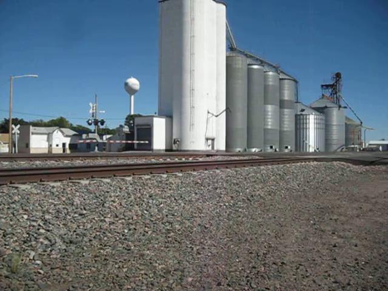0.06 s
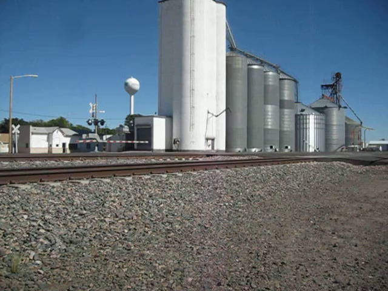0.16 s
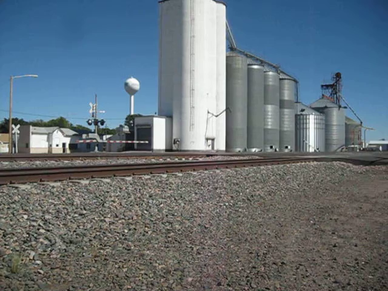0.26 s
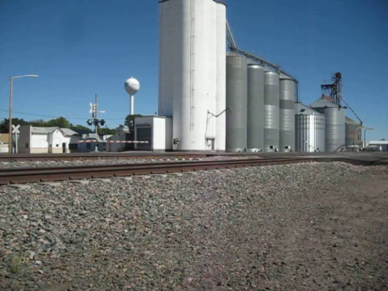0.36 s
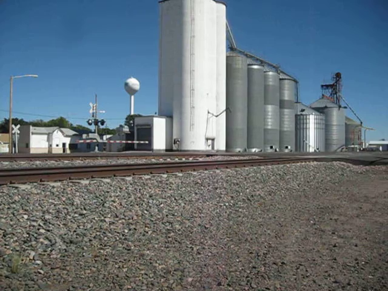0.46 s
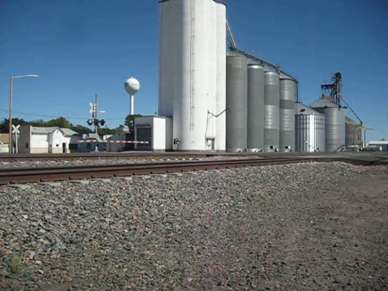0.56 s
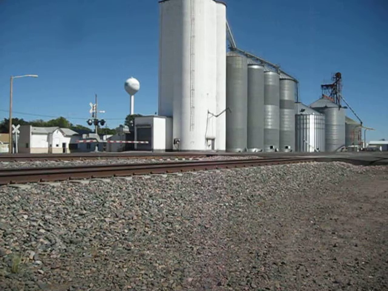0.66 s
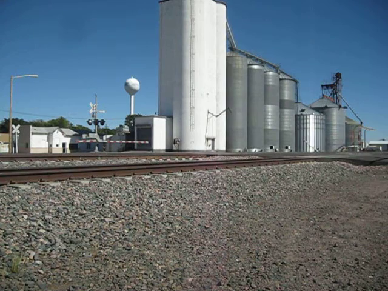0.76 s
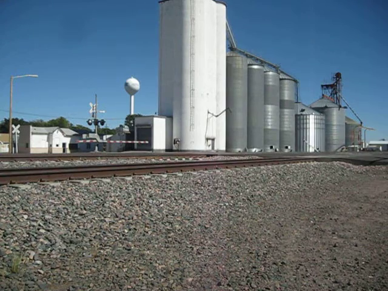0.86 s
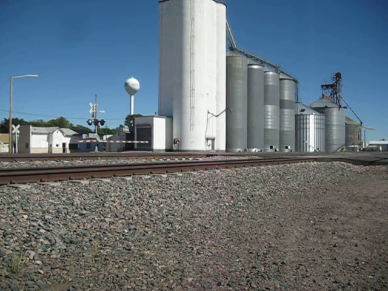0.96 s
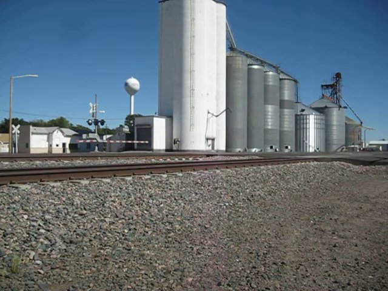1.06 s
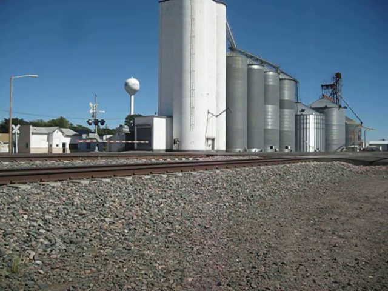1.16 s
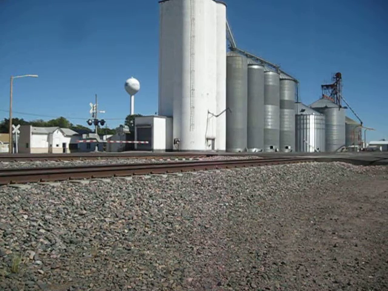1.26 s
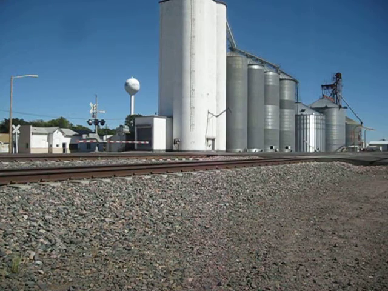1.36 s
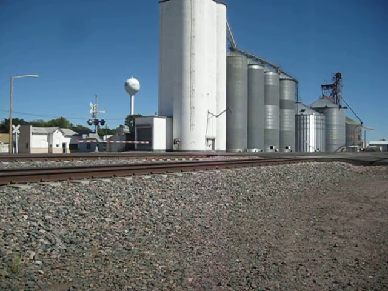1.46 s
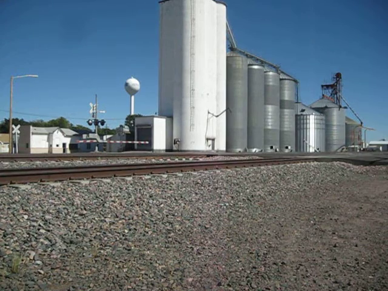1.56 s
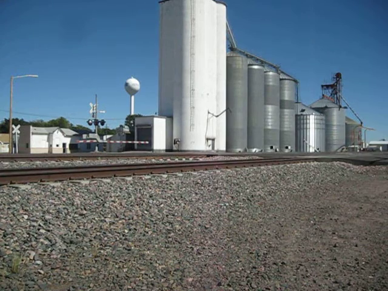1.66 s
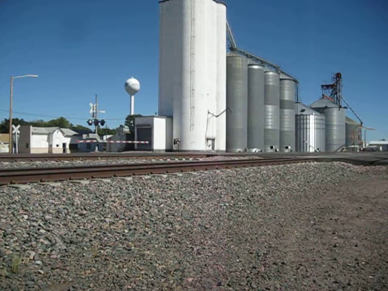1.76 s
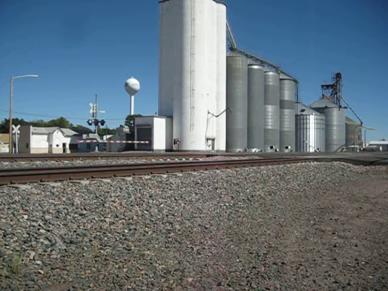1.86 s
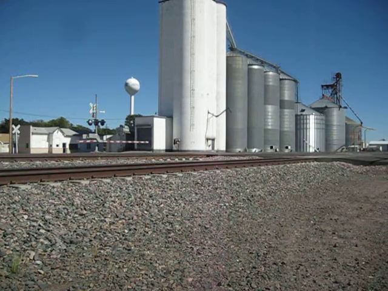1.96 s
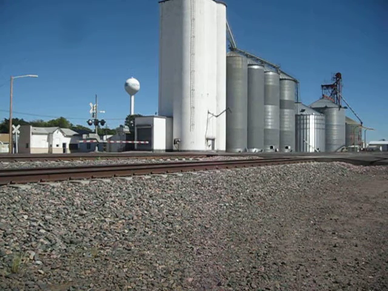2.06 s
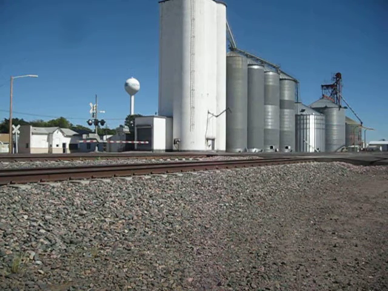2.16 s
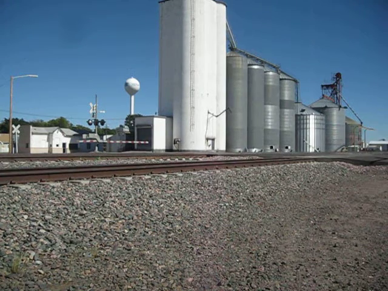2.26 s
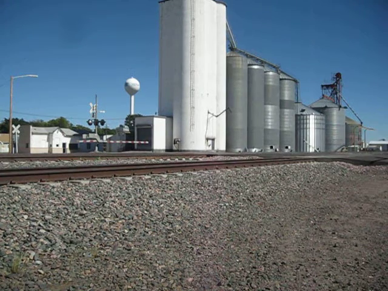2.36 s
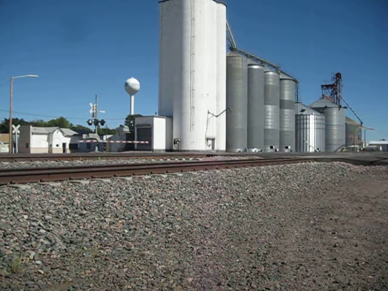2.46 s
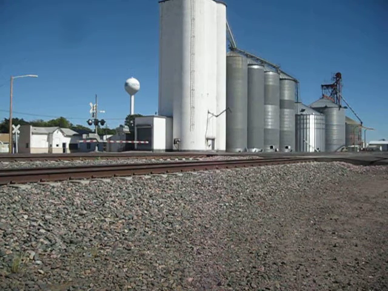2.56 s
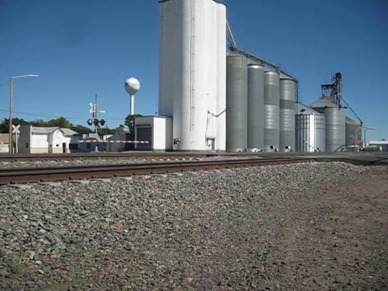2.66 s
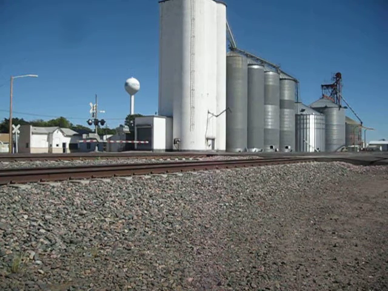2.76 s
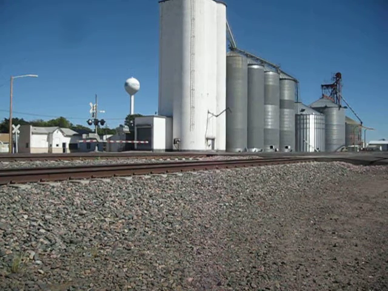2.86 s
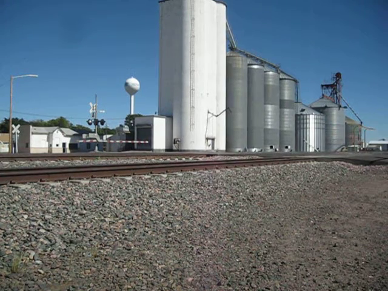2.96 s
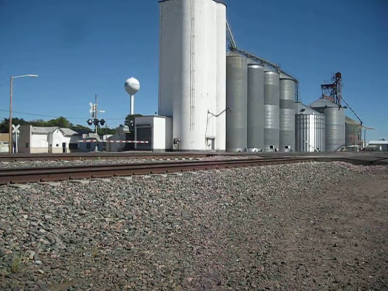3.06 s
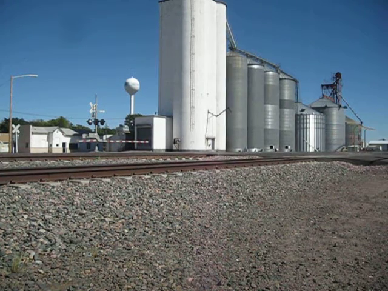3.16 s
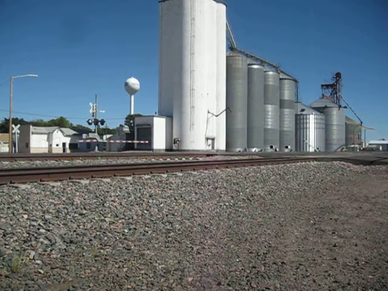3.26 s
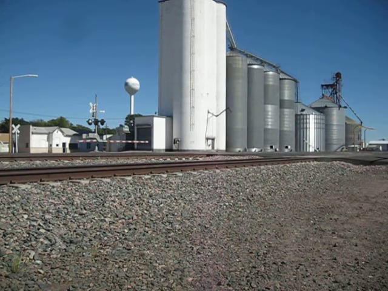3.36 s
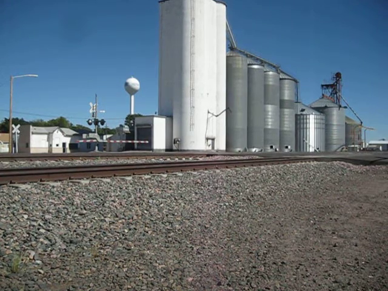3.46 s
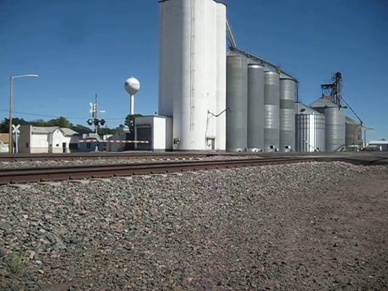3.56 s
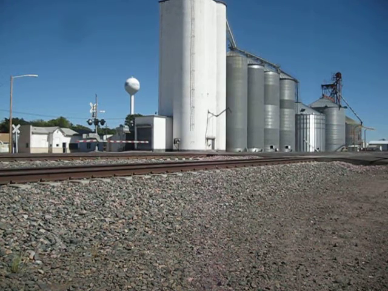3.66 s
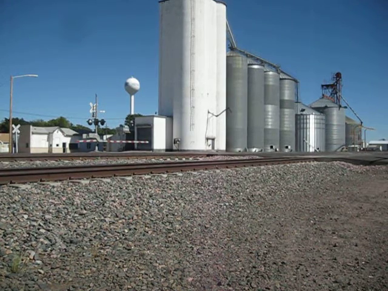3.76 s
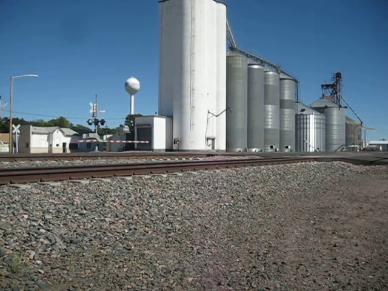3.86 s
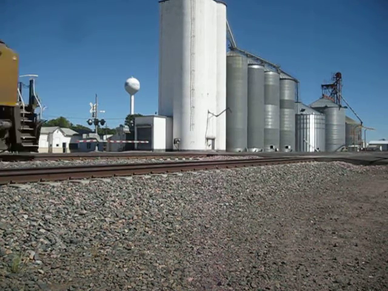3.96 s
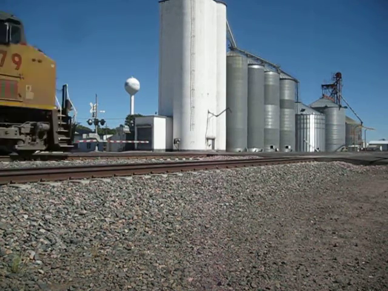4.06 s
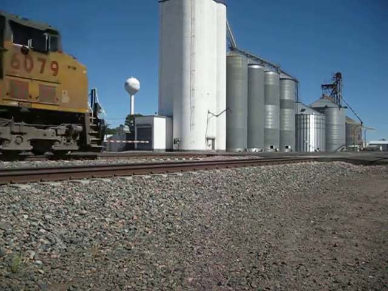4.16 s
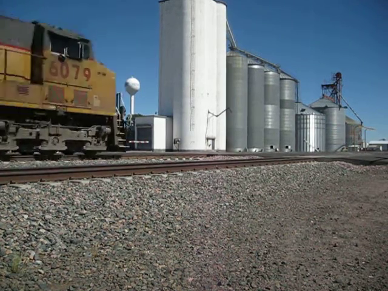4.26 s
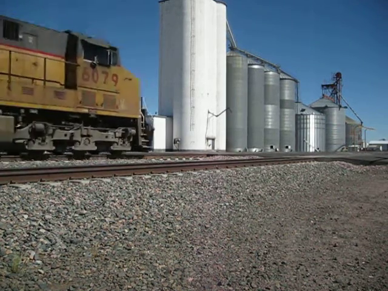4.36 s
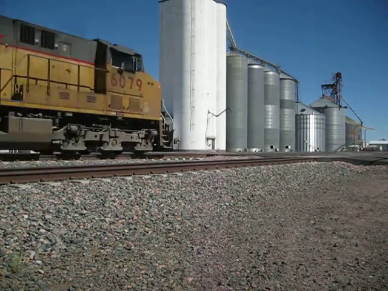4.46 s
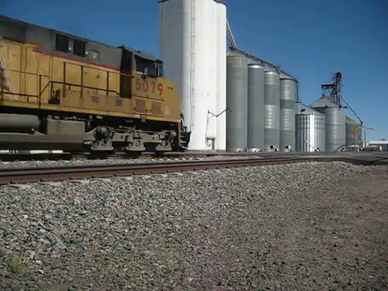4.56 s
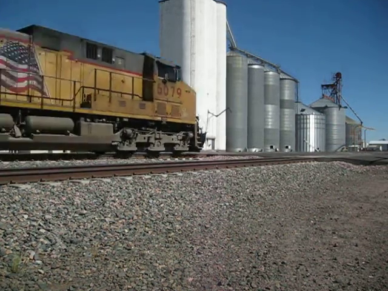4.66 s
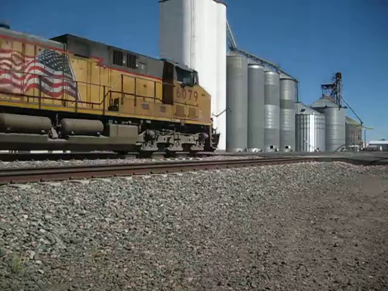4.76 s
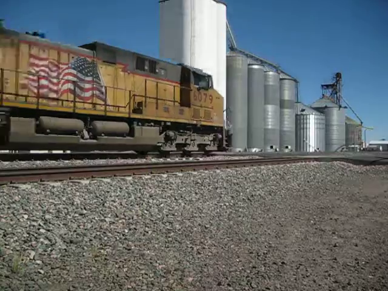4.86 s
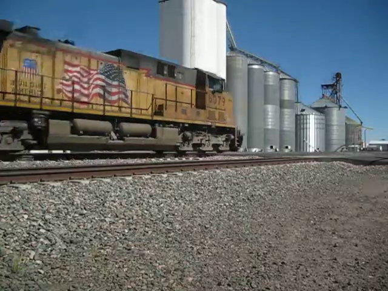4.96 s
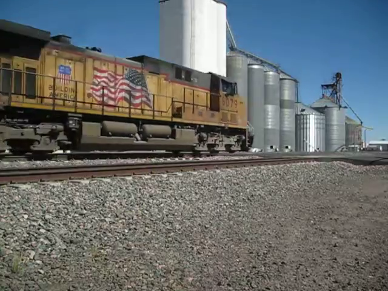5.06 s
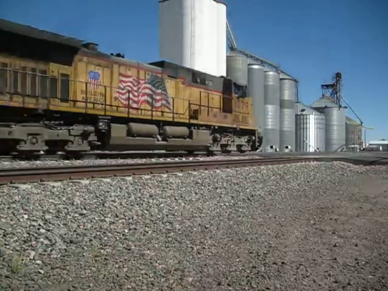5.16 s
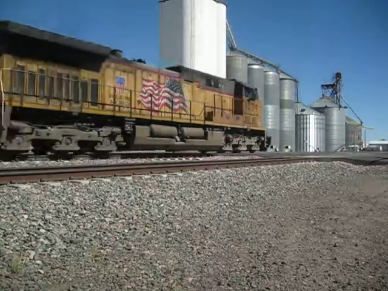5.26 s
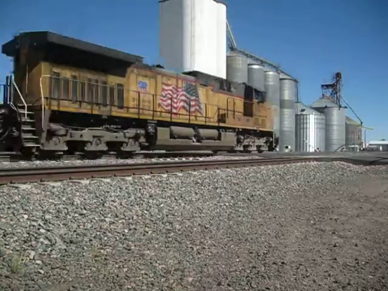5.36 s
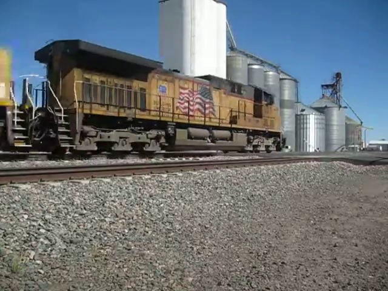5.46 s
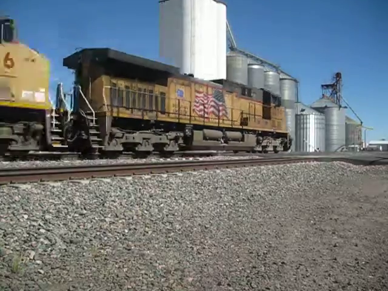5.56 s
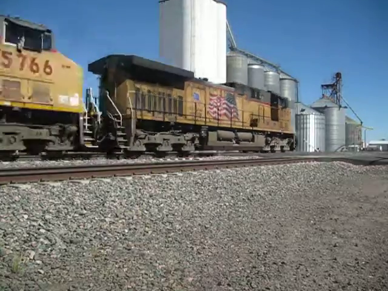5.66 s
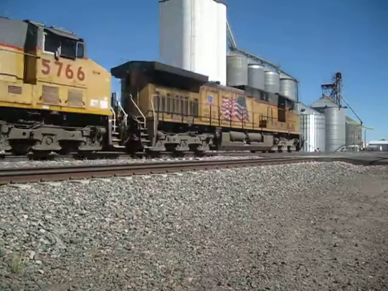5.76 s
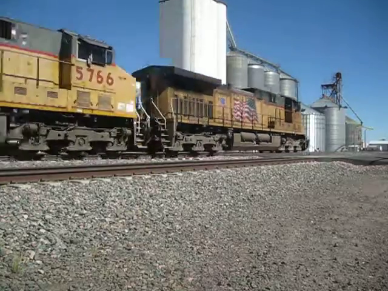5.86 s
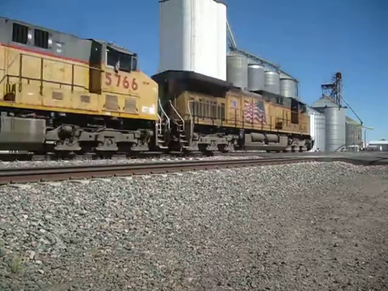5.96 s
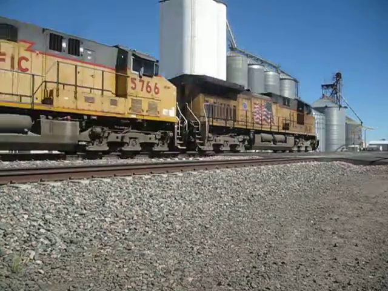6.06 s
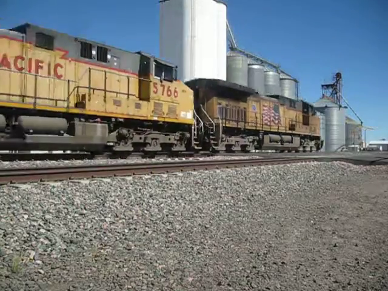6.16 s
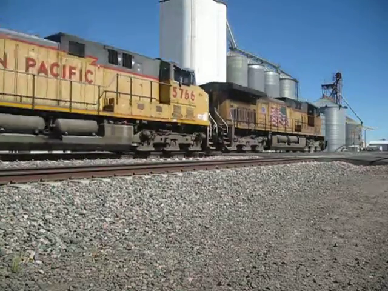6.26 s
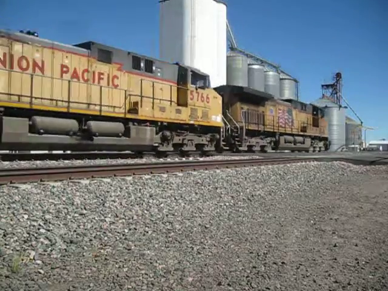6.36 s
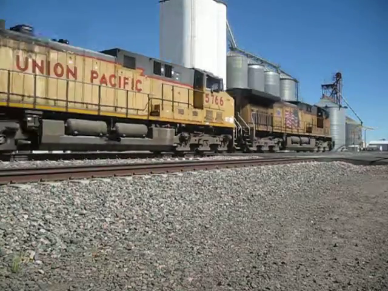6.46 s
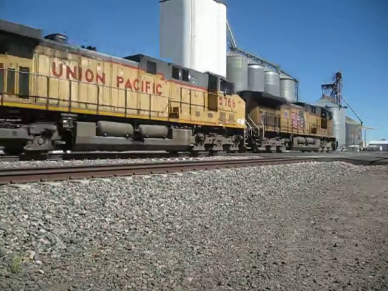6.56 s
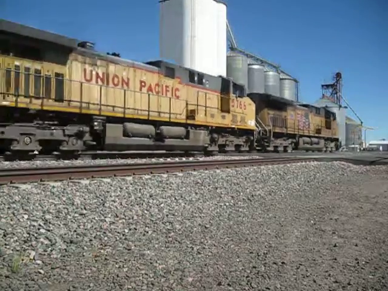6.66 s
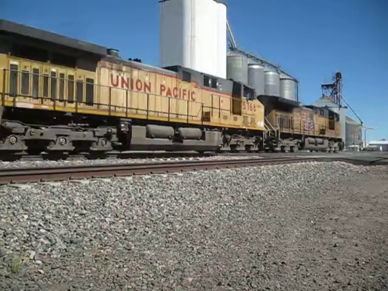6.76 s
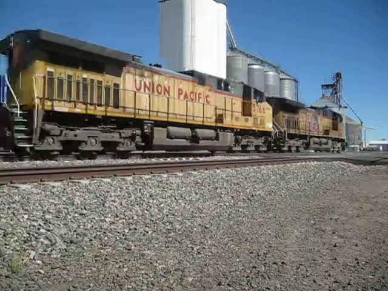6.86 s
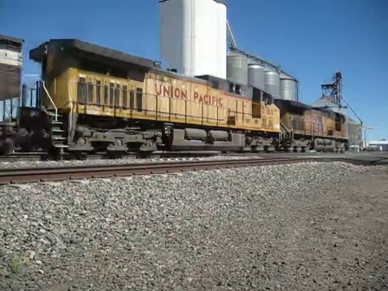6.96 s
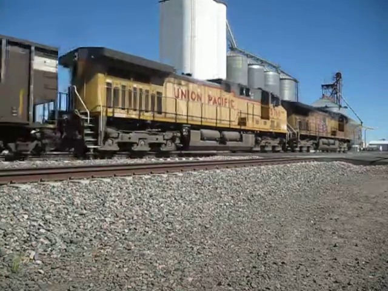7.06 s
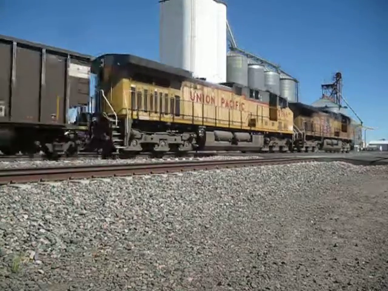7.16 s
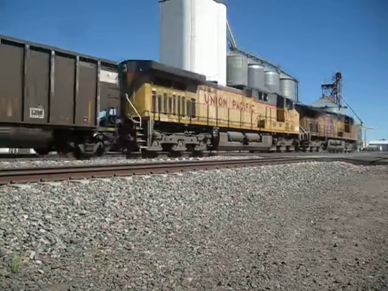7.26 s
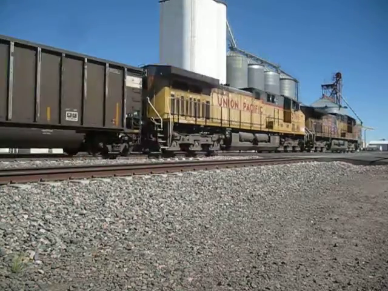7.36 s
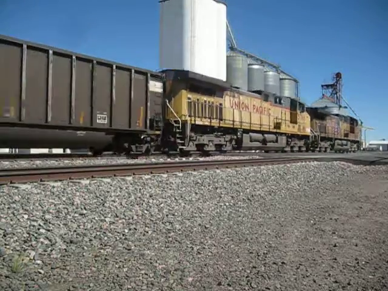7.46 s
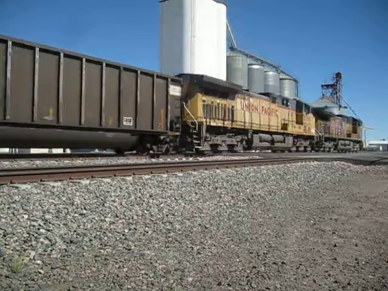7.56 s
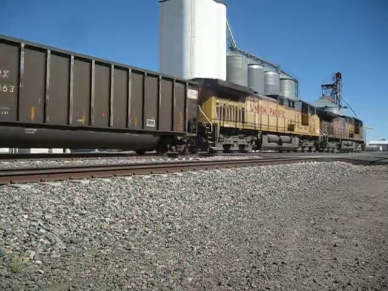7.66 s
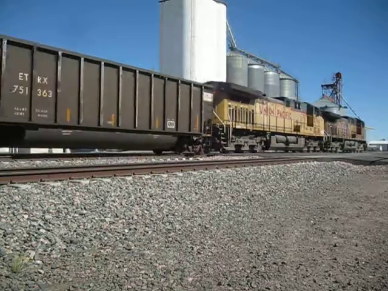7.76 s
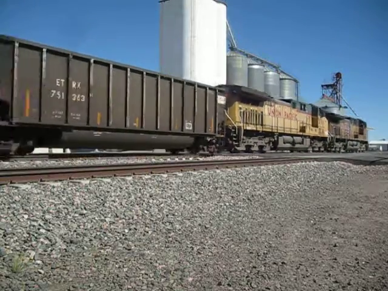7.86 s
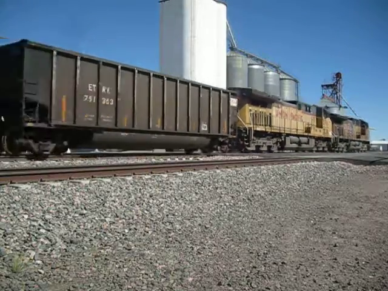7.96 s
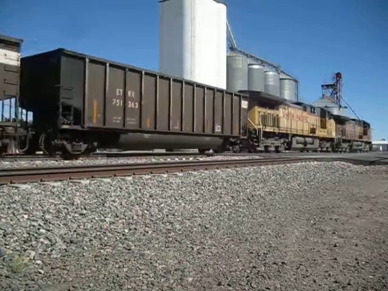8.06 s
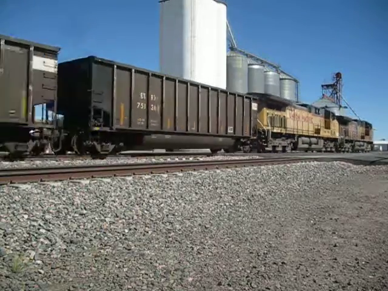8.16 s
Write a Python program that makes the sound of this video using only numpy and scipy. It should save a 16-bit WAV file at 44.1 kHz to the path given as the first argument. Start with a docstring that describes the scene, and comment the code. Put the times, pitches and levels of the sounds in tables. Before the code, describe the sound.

Outdoors beside the track, a crossing bell rings over the throb of an approaching diesel locomotive. Its air horn blows a short, brassy chord. Engines, whining fans and bells come through in the gap, then a longer, louder blast drops in pitch as the train passes, slightly overloading the microphone. The horn echoes away and freight wagons roll by, knocking over rail joints.

```python
"""At a level crossing, a diesel freight train runs past while bells ring and air valves spit.
Engines throb and fans whine, then the wheels of the first wagons roll and knock over rail joints.
The air horn's three reeds blow a short blast on the way in and a long one going by, falling in pitch.
Nearby buildings echo. The train dips in level under each blast, and the horn overloads the microphone."""
import sys
import numpy as np
from scipy import signal
from scipy.fft import rfft, irfft, next_fast_len
from scipy.io import wavfile
from scipy.ndimage import uniform_filter1d, map_coordinates

SR = 44100
rng = np.random.default_rng(int(sys.argv[2]) if len(sys.argv) > 2 else 0)


def unload_audio(sound):
    """Save the sound as a 16-bit wav file, at the path given as the first command line argument."""
    columns = np.transpose(np.atleast_2d(sound))
    # keep every value between -1 and 1, then stretch to whole-number steps
    steps = np.round(np.clip(columns, -1, 1) * 32767)
    wavfile.write(sys.argv[1], SR, steps.astype(np.int16))


N = 362405


def amp(db):
    """Turn decibels into a gain."""
    return 10 ** (np.asarray(db) / 20)


def unit(x):
    """Scale a signal to an average power of 1."""
    return x / np.sqrt(np.mean(x ** 2) + 1e-20)


def clock():
    """The time of each sample, in seconds."""
    return np.arange(N) / SR


def along(points, hz):
    """Read between (frequency, value) points on a log frequency axis."""
    f, v = np.transpose(points)
    return np.interp(np.log(hz + 1), np.log(f + 1), v)


def curves(rows):
    """Join a table's rows over time: one curve for each column after the first."""
    times, *columns = np.transpose(rows)
    return [np.interp(clock(), times, column) for column in columns]


def ramp(start, length):
    """Rise from 0 to 1 over `length` seconds."""
    return np.clip((clock() - start) / length, 0, 1)


def wobble(rate):
    """A smooth curve through `rate` random values a second."""
    coarse = np.linspace(0, N / SR, 2048)
    knots = rng.standard_normal(1024)
    return np.interp(clock(), coarse, map_coordinates(knots, [coarse * rate], mode="wrap"))


def running_phase(hz):
    """Add up a changing frequency into an angle for a sine wave."""
    return 2 * np.pi * np.cumsum(hz) / SR


def filtered(x, response):
    """Scale each frequency in x by response(hz)."""
    size = next_fast_len(N + SR // 2)
    return irfft(rfft(x, size) * response(np.fft.rfftfreq(size, 1 / SR)), size)[:N]


def noise(spectrum, patchy_db):
    """Noise shaped by a spectrum, with random louder and softer patches."""
    bins = signal.stft(rng.standard_normal(N), nperseg=1024)[2]
    patches = uniform_filter1d(rng.standard_normal(bins.shape), size=4, axis=0)
    patches = uniform_filter1d(patches, size=8, axis=1)
    patchy = signal.istft(bins * amp(patchy_db * unit(patches)), nperseg=1024)[1][:N]
    return unit(filtered(patchy, lambda hz: amp(along(spectrum, hz))))


# How long silos and sheds echo: f/Hz, time to fade by 60 dB/s
ECHO_TIMES = [(200, 1.3), (1500, 0.94), (6000, 0.3)]

def building_echo(x, wet_db):
    """Buildings throw back a wash of sound whose treble dies first."""
    hz, t, bins = signal.stft(rng.standard_normal(SR), SR, nperseg=256)
    fade = amp(-60 * t / along(ECHO_TIMES, hz)[:, None])
    tail = signal.istft(bins * fade, SR, nperseg=256)[1]
    echo = signal.fftconvolve(x, tail / np.linalg.norm(tail))[:N]
    return (x + amp(wet_db) * echo) / np.hypot(1, amp(wet_db))


# Loudness of the cooling fans: t/s, level/dB
FAN_LEVELS = [(0, -42), (.5, -41), (.7, -54), (2.3, -52), (2.65, -35), (3.1, -32), (3.7, -32), (3.9, -55),
              (8.2, -70)]

def fans(blade_hz=398, octave_db=-4):
    """Fan blades whine on one note and its octave, surging in the swirling air."""
    level, = curves(FAN_LEVELS)
    phase = running_phase(blade_hz * (1 + .02 * wobble(40)))
    blade = amp(4 * wobble(22)) * np.sin(phase)
    octave = amp(octave_db + 5.5 * wobble(22)) * np.sin(2 * phase)
    return amp(level) * unit(blade + octave)


# Ringing tones of the gong and the locomotive's bell: f/Hz, level/dB, time to fade by 60 dB/s
GONG_TONES = [(403.7, -13, 2), (1045, -7, 3), (1555.5, -11, 2.6), (2099.5, -10, 2.6), (2685.5, 0, 1.2)]
LOCO_BELL_TONES = [(1993, -8, .9), (2223, 0, 1), (2260, -4, .7), (3348, -14, .9), (3846, -9, 1)]
# When and how hard each is struck: t/s, level/dB
GONG_STROKES = [(-.24, -23), (.135, -21), (.51, -29), (.88, -35), (1.22, -33), (1.58, -34), (2.45, -32),
                (2.82, -31), (3.19, -32), (3.57, -35)]
LOCO_STROKES = [(.26, -28), (3.21, -28)]

def bell(strokes, tones, attack_s=.02):
    """Each stroke tops up the fading tones of the metal."""
    sound, t = np.zeros(N), clock()
    for hz, db, fade_s in tones:
        power = np.zeros(N)
        for start, stroke_db in strokes:
            age = np.maximum(t - start, 0)
            ring = amp(stroke_db + db + rng.normal(0, 1) - 60 * age / fade_s)
            power += (ring * (1 - np.exp(-age / attack_s))) ** 2
        sound += np.sqrt(power) * np.sin(2 * np.pi * hz * t + 0.36 * wobble(18))
    return building_echo(sound, wet_db=-12)


# Puffs of air: t/s, level/dB, length/s
PUFFS = [(0.417, -26, 0.035), (3.739, -29, .04), (7.803, -32.5, 0.037)]
# Tone colour of a puff: f/Hz, level/dB
PUFF_SPECTRUM = [(1200, -22.5), (1700, -6.5), (2300, 4.5), (3400, -3), (4400, 3), (5700, -1.5), (6800, -28)]

def air_valves():
    """Drain valves let out short puffs of compressed air."""
    opening = sum(amp(db) * ramp(start, 0.0027) * (1 - ramp(start + length - .012, 0.008))
                  for start, db, length in PUFFS)
    return building_echo(opening * noise(PUFF_SPECTRUM, patchy_db=4), wet_db=-24.5)


# Wheels hitting rail joints: t/s, level/dB
KNOCKS = [(7.41, -24), (7.469, -20), (7.501, -16.5), (7.731, -23), (7.774, -18), (8.0, -22), (8.158, -28)]
# Tone colour of the shaken wheel frames: f/Hz, level/dB
FRAME_SPECTRUM = [(60, -18), (150, -6), (330, 2), (600, -5.5), (1500, -24.5), (5000, -37)]

def wheel_knocks(fade_s=0.11):
    """Wheels drop over rail joints and shake the frames that hold them."""
    blows = sum(amp(db - 60 * np.maximum(clock() - start, 0) / fade_s) * ramp(start, 0.002)
                for start, db in KNOCKS)
    return blows * noise(FRAME_SPECTRUM, patchy_db=2)


# Tones of the engine: multiple of the firing rate, level/dB
FIRING_TONES = [(1, -4.5), (1.5, -8.5), (2, -8.5), (2.5, -12.5), (3, -20)]
# Tone colour of the exhaust: f/Hz, level/dB
EXHAUST_SPECTRUM = [(12, -60), (20, -27), (54, 5), (70, 0), (102, -2), (145, -2.5), (300, -13.5),
                    (390, -49.5), (660, -120)]

def diesel(firing_hz=70, firing_db=-5, exhaust_db=-1):
    """Firing cylinders throb a little unevenly over the rush of the exhaust."""
    phase = running_phase(firing_hz * (1 + .025 * wobble(9)))
    throb = unit(sum(amp(db + wobble(9.1)) * np.sin(k * phase) for k, db in FIRING_TONES))
    return amp(firing_db) * throb + amp(exhaust_db) * noise(EXHAUST_SPECTRUM, patchy_db=1.5)


# How the train swells and dips: t/s, then relative level/dB of rumble, rolling and rail hiss
TRAIN_LEVELS = [(0.05, -29, -38, -51.5), (0.25, -30.5, -35.5, -47.5), (0.48, -26, -32, -44),
                (0.62, -44.5, -40, -52), (0.8, -47, -43.5, -44.5), (1.1, -50, -35.5, -39.5),
                (1.4, -52, -42.5, -43.5), (1.7, -57.5, -36.5, -41), (2, -44.5, -40, -47),
                (2.1, -45.5, -36.5, -51), (2.2, -24.5, -33.5, -51.5), (2.35, -31.5, -31.5, -49.5),
                (2.5, -25.5, -27, -44.0), (2.8, -26, -25.5, -41.5), (3.1, -26, -25.5, -40.5),
                (3.4, -27, -27, -38), (3.65, -27.5, -25, -38), (3.8, -27.5, -28, -37.5),
                (3.9, -45, -34, -52), (4.05, -39, -31, -41.5), (4.3, -41.5, -32.5, -36),
                (4.6, -40, -29, -33.5), (5, -40, -29.0, -29), (5.4, -45.5, -32, -32), (5.8, -37, -29, -29),
                (6.1, -45, -30.5, -31.5), (6.5, -47.5, -34.5, -31.5), (6.8, -42, -34, -36.5),
                (7, -46.5, -36, -32.5), (7.15, -41.5, -32, -41), (7.3, -40, -28.5, -40.5),
                (7.4, -33, -25.5, -34.5), (7.49, -26, -28, -36), (7.55, -32, -33.5, -45.5),
                (7.63, -27.5, -26.5, -32), (7.72, -28, -27.5, -35.5), (7.79, -25.5, -26.5, -34),
                (7.87, -34, -28.5, -36.5), (7.95, -28, -26, -33.5), (8.05, -29.5, -27, -30.5),
                (8.17, -23.5, -26.5, -32.5)]
# Tone colours of the wheels and rails: f/Hz, level/dB
WAGON_RUMBLE = [(12, -56), (20, -14.5), (98, 5.5), (155, 4.5), (300, 0.5), (390, -33), (660, -120)]
LOCO_ROLL = [(120, -31), (200, -19), (341, -9.5), (397, -2.5), (494, -13), (795, -3), (893, -10),
             (1210, -9.5), (1470, -14), (2160, -15.5), (2540, -22.5), (2750, -27.5), (3200, -29.5),
             (4160, -68), (7040, -120)]
WAGON_ROLL = [(120, -22), (200, -19.5), (357, -0.5), (401, -9), (524, -9), (661, -12), (751, -10),
              (980, -17), (1130, -11), (1210, -14.5), (3200, -22.5), (4160, -44.5), (7040, -120)]
RAIL_HISS = [(1800, -49), (2800, 7.5), (4000, 4.5), (5500, 0.5), (6300, -13.5), (7000, -42)]

def train(roll_db=2.5, hiss_db=-1):
    """The engine's throb gives way to the rumble and roar of wheels on hissing rails."""
    low_gain, roll_gain, hiss_gain = amp(curves(TRAIN_LEVELS))
    # cosine and sine blend one sound into the next at steady power
    to_rumble, to_wagons = ramp(3.75, 1.0) * np.pi / 2, ramp(6.94, 0.58) * np.pi / 2
    low = np.cos(to_rumble) * diesel() + np.sin(to_rumble) * noise(WAGON_RUMBLE, patchy_db=1)
    roar = np.cos(to_wagons) * noise(LOCO_ROLL, patchy_db=1)
    roar += np.sin(to_wagons) * noise(WAGON_ROLL, patchy_db=1)
    hiss = noise(RAIL_HISS, patchy_db=1) * amp(hiss_db + .7 * wobble(22))
    roar *= amp(roll_db + 1.28 * wobble(27))
    return low_gain * low + roll_gain * roar + hiss_gain * hiss


# A tick during the long blast: t/s, level/dB
TICK = (4.742, -12)

def tick(decay_s=.0003):
    """A sharp tick: a sudden jump that dies away at once."""
    start, db = TICK
    age = clock() - start
    return amp(db) * (age >= 0) * np.exp(-np.abs(age) / decay_s)


# The horn's lowest note as heard beside the track: t/s, f/Hz
HORN_PITCH = [(0.58, 337.3), (0.7, 331.2), (0.8, 330.8), (1.0, 328.4), (1.2, 329), (1.5, 327.1),
              (1.8, 328.4), (2.0, 323.2), (2.25, 320.6), (3.88, 328.3), (4.0, 323.5), (4.15, 321),
              (4.3, 317.1), (4.5, 314.6), (4.7, 312.6), (4.9, 308.8), (5.1, 306.6), (5.4, 308.2),
              (5.7, 307.9), (6.0, 307.5), (6.3, 305.2), (6.6, 304.4), (6.9, 306), (7.1, 303.4)]
# Its three notes: pitch as a multiple of the lowest
NOTE_RATIOS = [1, 1.207, 1.552]
# Higher notes start later and fade first: t/s, then relative level/dB of low, middle and high note
NOTE_BALANCE = [(.53, 7, -5, -2), (.72, 0, -3.5, -7.5), (.95, -3, -3, 1), (1.85, -4, -3, -2.5),
                (2.1, 0, 0.5, -5), (3.839, 0.5, -3, -5.5), (4.05, 1, -4.5, -2), (5.302, -0.5, 3.5, 5.5),
                (6.301, -2, -4.5, -4), (6.601, -4.5, -7.5, -3.5), (7.299, 4, 4.5, -6.5)]
# Overtones from four sides of the horn: multiple, then relative level/dB of low, middle and high note
FAR_AHEAD = [(1, -2.5, -4.5, -5.5), (2, -5, -7.5, -5.5), (3, -5.5, -7.5, -6), (4, -8.0, -10, -10.5),
             (5, -13, -17, -14.5), (6, -14, -17.5, -19.5), (7, -17.5, -21.5, -21.5), (8, -23, -21, -25.5),
             (9, -20, -23.5, -21), (10, -31.5, -25, -24.5), (11, -24.5, -34, -30.5), (12, -24.0, -45, -57)]
NEAR_AHEAD = [(1, -3.5, -2.5, -8), (2, -1, -4, -5.5), (3, -7, -16.5, -11.5), (4, -12.5, -15, -10.5),
              (5, -18, -21.5, -21), (6, -31.5, -19, -14.5), (7, -33.5, -18.5, -24), (8, -37.5, -27, -26.5),
              (9, -34.5, -24, -26.5), (10, -30, -35, -32), (11, -46, -30.5, -31), (12, -40.5, -31, -46)]
BESIDE = [(1, -4.5, -0.5, -5), (2, -3, -1.5, -25.5), (3, -4.5, -12, -7.5), (4, -11.5, -12, -17.5),
          (5, -26, -22, -13.5), (6, -22.5, -17.5, -15), (7, -19.5, -17, -17), (8, -20, -20, -27.5),
          (9, -22, -19, -26), (10, -28, -30, -26.5), (11, -26, -33, -22), (12, -19, -29, -34.5)]
BEHIND = [(1, -10.5, -4.5, 0), (2, 0.5, 0, -10.5), (3, -2.5, -4.5, -8.5), (4, -8.5, -7.5, -10.5),
          (5, -10, -10, -12), (6, -16, -8, -10), (7, -15, -11, -11), (8, -10.5, -17, -14),
          (9, -19, -25, -20.5), (10, -16.5, -29, -17), (11, -16.5, -21.5, -17.5), (12, -14, -25, -20)]
# Reflections grow with distance and after the air shuts off: t/s, strength against the direct sound
REFLECTED = [(.53, 0.11), (.9, 0.83), (1.9, 0.33), (2.2, 0.94), (3.84, 0.1), (4.6, 0.26), (6, 0.22),
             (6.6, 0.67), (7.3, 0.93)]
# Edges of three bands, called body, blare and rasp: f/Hz
BAND_EDGES = [250, 850, 2800, 6800]
# Shape of each blast: t/s, then relative level/dB of body, blare and rasp
SHORT_BLAST = [(0.56, -14, -31, -65), (0.62, -18, -25.5, -50.5), (0.7, -19.5, -27, -41),
               (0.8, -20.5, -26.5, -39), (0.95, -18.5, -24.5, -42), (1.1, -21, -26.5, -38.5),
               (1.25, -20, -23, -36), (1.4, -23.5, -22.5, -35), (1.55, -19, -26, -36),
               (1.7, -19.5, -23.5, -43), (1.85, -23.5, -26.5, -42.5), (1.95, -20, -25, -43.5),
               (2.05, -19.5, -31, -52.5), (2.15, -21.5, -30.5, -47), (2.3, -14.5, -24, -40)]
LONG_BLAST = [(3.87, -16, -32, -63), (3.93, -14.5, -20.5, -40.5), (4.002, -12, -21, -45.5),
              (4.15, -13.5, -19, -36), (4.3, -14.5, -17.5, -28), (4.5, -14, -23, -32),
              (4.65, -13.5, -18.5, -27.5), (4.9, -14.5, -21, -31.5), (5.15, -12.5, -20, -24),
              (5.4, -13, -15.5, -31), (5.701, -14, -19, -29), (5.998, -13, -20, -25),
              (6.199, -16, -20.5, -28), (6.4, -20.5, -20.5, -28), (6.65, -22, -23, -34.5),
              (6.8, -24, -24, -23.5), (6.95, -21, -21, -27.5), (7.1, -24.5, -27.5, -33),
              (7.2, -26, -29, -41.5), (7.4, -14, -33, -47.5)]
# When each blast sounds: start t/s, last echo t/s
BLAST_TIMES = [(.526, 2.42), (3.838, 7.48)]

def horn(waver=.0007, flutter_rate=17, rolloff_db=-2.5, bloom_s=0.065, level_db=-0.55):
    """Air buzzes three reeds, each rich in overtones; the colour turns as the horn mouths swing past."""
    t = clock()
    pitch, = curves(HORN_PITCH)
    reflected, = curves(REFLECTED)
    approach = ramp(2.6, 1.1)
    position = approach + ramp(4.36, .25) + ramp(5.09, 0.35)  # from far ahead (0) to behind (3)
    # a reed starts nearly pure and turns brassy as its swing grows
    purity = sum((t >= start) * np.exp(-np.abs(t - start) / bloom_s) for start, _ in BLAST_TIMES)
    purity += 0.6 * ramp(6.995, 0.37)  # the last echoes lose most overtones
    bands, power = np.zeros((3, N)), np.zeros((3, N))
    for note, (ratio, note_db) in enumerate(zip(NOTE_RATIOS, curves(NOTE_BALANCE))):
        phase = running_phase(pitch * ratio * (1 + waver * wobble(12)))
        base_hz = np.median(pitch) * ratio
        overtones = np.array([FAR_AHEAD, NEAR_AHEAD, BESIDE, BEHIND])[:, :, note + 1]
        for k in range(1, int(BAND_EDGES[-1] / base_hz) + 1):
            if k <= len(FAR_AHEAD):
                sides_db = overtones[:, k - 1]
            else:
                sides_db = overtones[:, -2:].mean(axis=1) + rolloff_db * (k - len(FAR_AHEAD))
            colour_db = np.interp(position, np.arange(4), sides_db)
            air_db = -32 * (1 - approach) * max(k * base_hz / 4800 - 1, 0)  # air dulls the far horn
            gain = amp(colour_db + note_db + air_db - 20 * np.log2(k) * purity + wobble(3.04))
            # motion shifts the reflections' pitch, so they beat with the direct tone, faster higher up
            rate = flutter_rate * k ** .4
            tone = (1 + reflected * wobble(rate)) * np.sin(k * phase)
            tone += reflected * wobble(rate) * np.cos(k * phase)
            band = np.searchsorted(BAND_EDGES, k * base_hz) - 1
            bands[band] += gain * tone
            power[band] += gain ** 2 * (.5 + reflected ** 2)
    blasts = sum(amp(curves(shape)) * ramp(start, .016) * (1 - ramp(end - .3, .3))
                 for shape, (start, end) in zip((SHORT_BLAST, LONG_BLAST), BLAST_TIMES))
    chord = np.sum(blasts * bands / np.sqrt(power), axis=0)
    return amp(level_db) * building_echo(chord, wet_db=-15.0)


def scene(bell_dip_db=-9):
    """Mix the trackside sounds in mono, turning the bells down under the first blast."""
    bells = bell(GONG_STROKES, GONG_TONES) + bell(LOCO_STROKES, LOCO_BELL_TONES)
    first_blast = ramp(.54, .06) - ramp(2.1, .3)
    bells *= amp(bell_dip_db * first_blast)
    return (horn() + train() + fans() + bells + air_valves() + wheel_knocks())[None]


def record(dry, ceiling=0.29, hardness=6, lopsided=0.33, mic_hz=6450, top_hz=16000):
    """The microphone squashes loud peaks and cuts the high treble; the tick is added on top."""
    def mic_response(hz):
        bass_cut = hz / np.hypot(hz, 20)
        return bass_cut / np.sqrt(1 + (hz / mic_hz) ** 90) * (hz < mic_hz + 450)

    rounded = dry[0] / (1 + np.abs(dry[0] / ceiling) ** hardness) ** (1 / hardness)
    uneven = rounded - lopsided * rounded ** 2  # makes low tones at the differences between the notes
    dulled = filtered(uneven, mic_response)
    return filtered(dulled + tick(), lambda hz: hz < top_hz)[None]


dry = scene()
out = record(dry)
unload_audio(out)
```